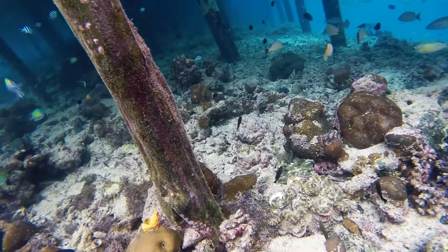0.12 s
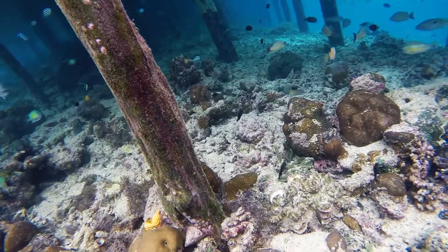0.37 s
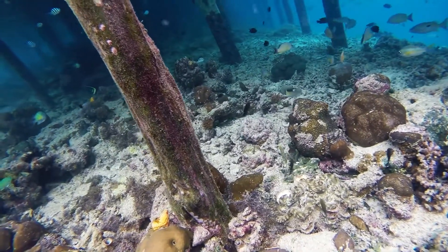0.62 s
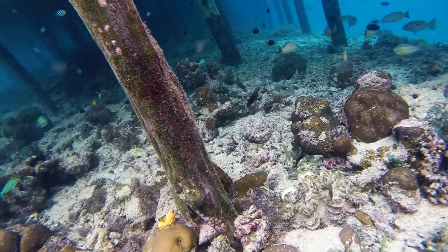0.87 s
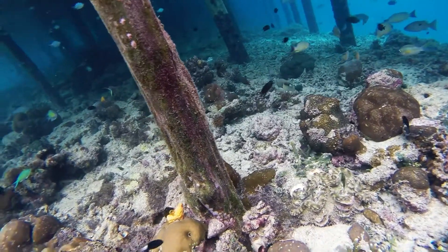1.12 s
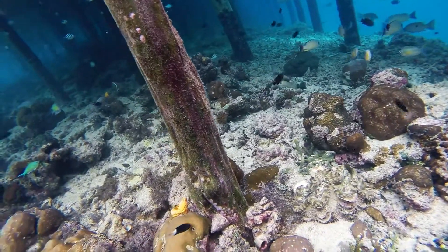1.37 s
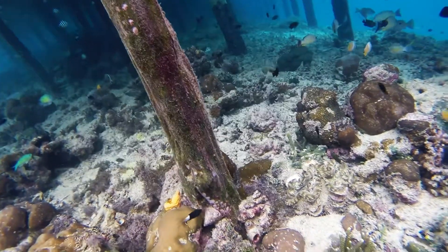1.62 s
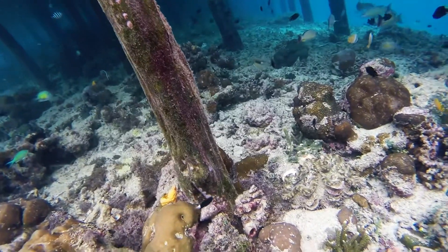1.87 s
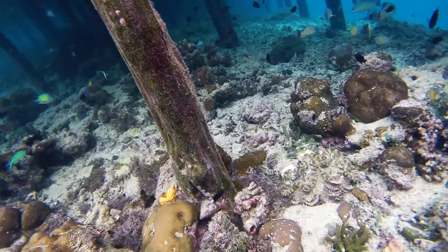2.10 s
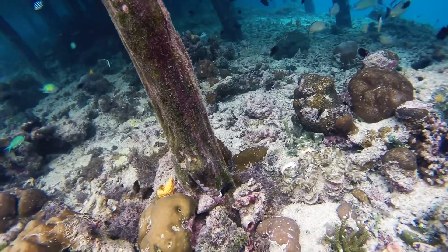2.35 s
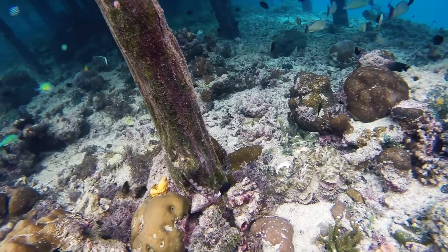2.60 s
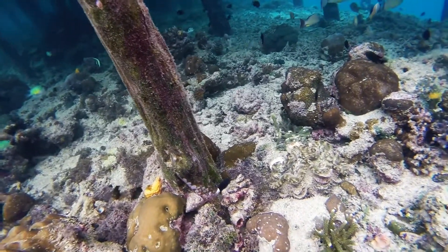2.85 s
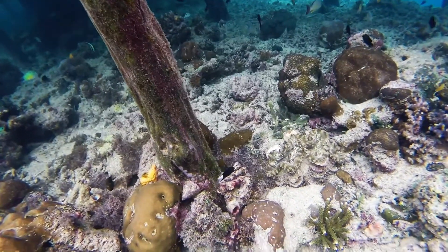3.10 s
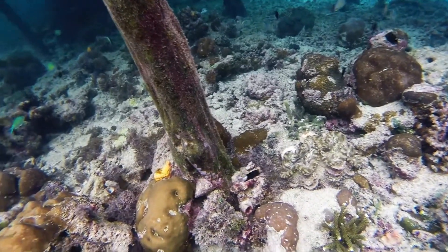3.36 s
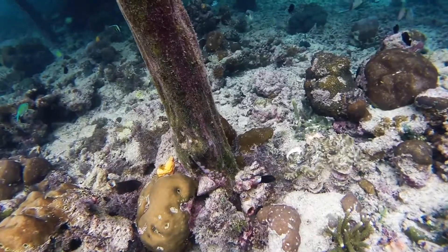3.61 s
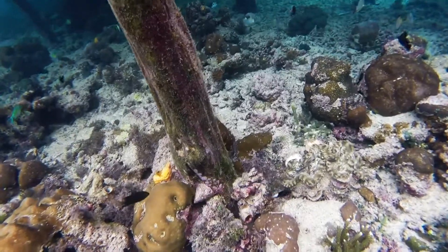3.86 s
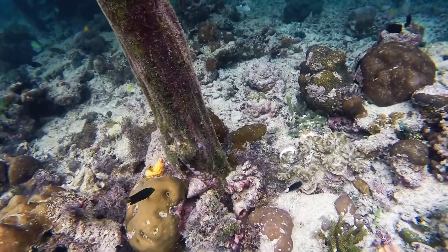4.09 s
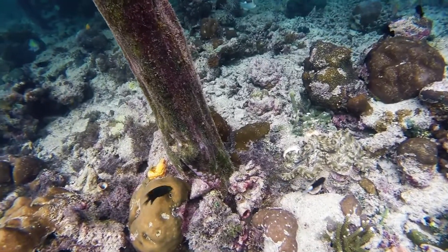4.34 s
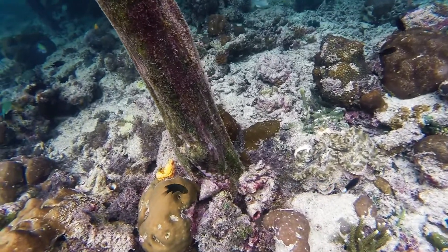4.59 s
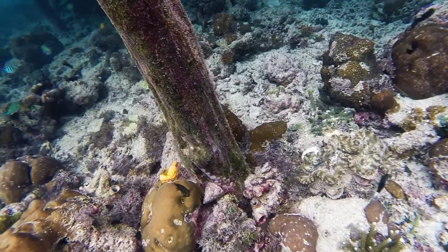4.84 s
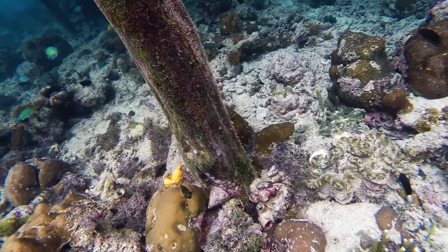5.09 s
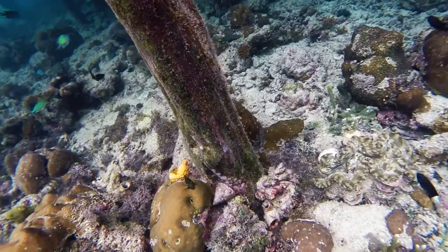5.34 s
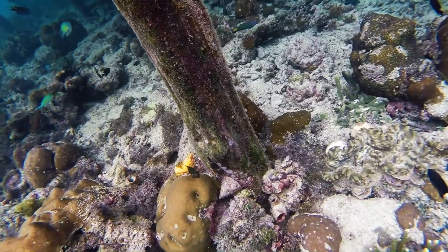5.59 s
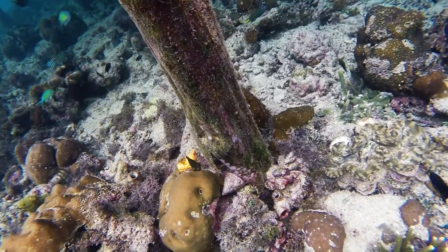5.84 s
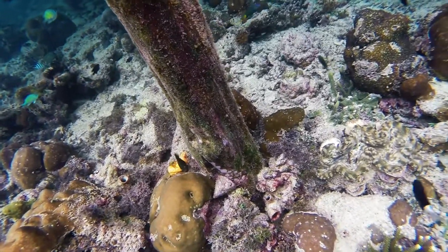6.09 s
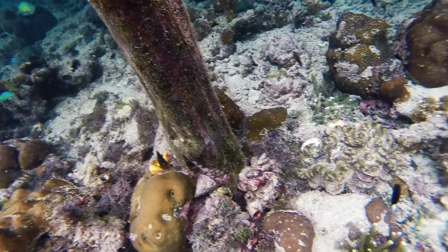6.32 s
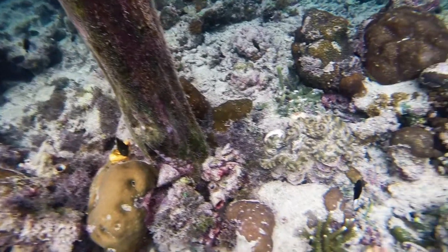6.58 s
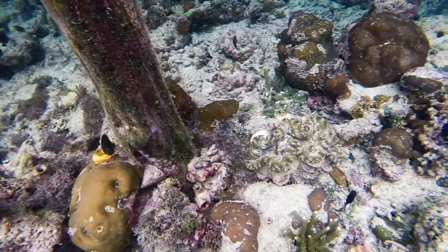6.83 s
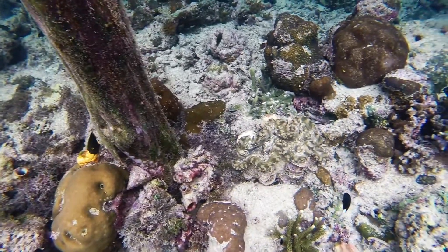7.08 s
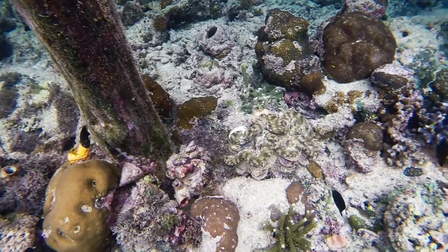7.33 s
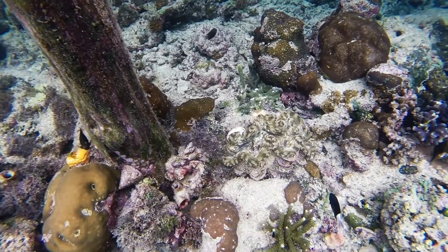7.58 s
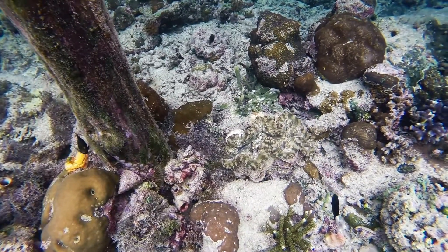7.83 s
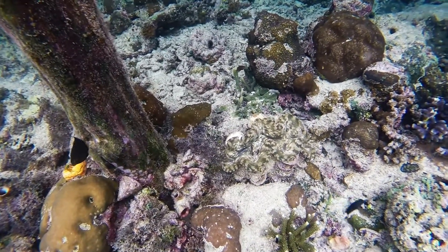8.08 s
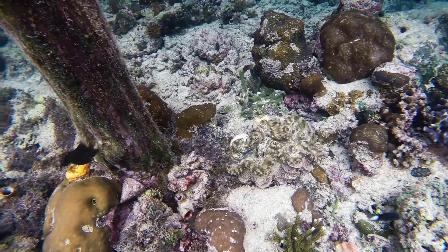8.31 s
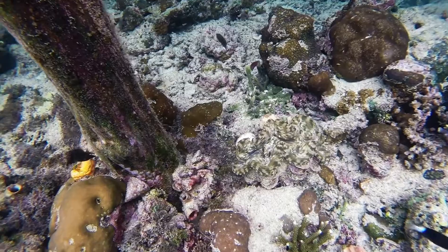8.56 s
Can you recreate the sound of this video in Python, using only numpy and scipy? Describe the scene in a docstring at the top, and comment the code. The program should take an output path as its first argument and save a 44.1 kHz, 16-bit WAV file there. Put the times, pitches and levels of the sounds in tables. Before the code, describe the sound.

Sharp shrimp snaps crackle over a faint underwater rumble, with soft fish pops and a patch of low bumps and knocks on the camera housing.

```python
"""Under a pier, over a shallow reef, a small camera drifts in a sealed hand-held housing.
Snapping shrimp crackle near and far: each snap excites the damped modes of the housing wall.
Fish pop and grunt as swim bladders twitch, heard as short wavelets, over coloured sea noise.
The housing rubs, knocks and rumbles: filtered noise, slow pushes and one ringing case mode.
Once a faint swish rises: a gliding tone modulated by noise."""
import sys
import numpy as np
from scipy import signal
from scipy.fft import rfft, irfft
from scipy.io import wavfile

SR = 44100
rng = np.random.default_rng(int(sys.argv[2]) if len(sys.argv) > 2 else 0)


def invert_db(x):
    """Field ratio 10**(x/20) for x, a level in decibels (scalar or array-like)."""
    u = np.asarray(x, float) / 20
    return 10 ** u


def wav_record(signal):
    """Record a signal, one row per channel, as 16-bit PCM in the file named by sys.argv[1]."""
    frames = np.transpose(np.atleast_2d(signal))
    bounded = np.clip(frames, -1, 1)
    # unit amplitude maps onto the largest positive 16-bit level
    quanta = np.round(bounded * 32767).astype(np.int16)
    wavfile.write(sys.argv[1], SR, quanta)


N = 383229
TIME = np.arange(N) / SR  # s

# modes of the housing wall: (frequency [Hz], mean level [dB], mean-tuning decay t60 [s])
WALL = [(696, -6, 0.019), (1203, -10, 0.035), (1460, -2.5, 0.014), (1795, -4, 0.021), (2036, -2.5, 0.0087),
        (2190, -4, 0.016), (2491, -0.5, 0.017), (2930, 7, 0.0035), (3540, -2.5, 0.011), (3960, -0.5, 0.014),
        (4410, 4.5, 0.0085), (4934, 4.5, 0.0068), (6270, -2, 0.0089), (7430, 2, 0.0074),
        (8750, 3.5, 0.0043), (9950, -1.5, 0.0081), (11270, -5.5, 0.006), (13240, -5.5, 0.0073),
        (14800, -13, 0.0032)]
CASE_HZ, CASE_T60_S = 181, 0.066  # the ringing mode of the whole case


def rms_one(x):
    """Normalisation of the mean power: scales to unit rms."""
    return x / np.sqrt(np.mean(x ** 2) + 1e-20)


def band(x, low_hz, high_hz):
    """Band-pass filtering by a Butterworth resonator."""
    return signal.sosfilt(signal.butter(2, [low_hz, high_hz], "band", fs=SR, output="sos"), x)


def ring(clicks, hz, t60):
    """Impulse response of a damped resonator: a unit click starts a decaying sine of height 1."""
    radius = invert_db(-60 / (t60 * SR))
    angle = 2 * np.pi * hz / SR
    poles = [1, -2 * radius * np.cos(angle), radius * radius]
    return signal.lfilter([0, np.sin(angle)], poles, clicks + 1e-18)  # the offset avoids denormals


def drift(rate):
    """Slow random modulation: lines join normal values of spread 1, rate of them per second."""
    knots = rng.standard_normal(1000)
    return np.interp(TIME * rate, np.arange(len(knots)), knots)


def grains(per_s, spread_db):
    """Random impulse process: clicks of either sign at chance moments, many small and few large."""
    size_db = spread_db * np.minimum(rng.exponential(1, N), 4.0)
    sizes = invert_db(size_db) * rng.choice([-1, 1], N)
    return sizes * (rng.random(N) < per_s / SR)


def add(out, s, shape, peak_db):
    """Linear superposition: lays a short shape into the track at its peak level."""
    i = int(s * SR)
    scaled = invert_db(peak_db) * shape / np.abs(shape).max()
    out[i:i + len(shape)] += scaled[:N - i]


def twitch(hz, cycles, lean):
    """Pulsation of a swim bladder: a Gaussian wavelet, returned with the time of its centre."""
    span = np.clip(cycles, .7, 6) / hz
    u = TIME[:2200] - span
    return np.exp(-(u / (0.36 * span)) ** 2) * np.cos(2 * np.pi * hz * u + lean), span


def blips(per_s, low_hz, high_hz, cycles):
    """Resonators in cascade: random clicks, dealt to six pitches, ring softly; rms 1."""
    clicks = grains(per_s, spread_db=4.0)
    dealt = rng.integers(0, 6, N)
    total = np.zeros(N)
    for k, hz in enumerate(np.geomspace(low_hz, high_hz, 6)):
        once = ring(clicks * (dealt == k), hz, cycles / hz)
        total += ring(once, hz, cycles / hz) * hz  # ringing twice softens the onset
    return rms_one(total)


def effort(start, length, level_db, rest_db):
    """Addition of powers: movements rise quickly, hold and die away over the still hand's level."""
    rise_s, fall_s = 0.011, 0.033
    coarse = TIME[::100]
    since = coarse - start[:, None]
    rise = np.clip(since / rise_s, 0, 1)
    fall = np.exp(-np.maximum(since - length[:, None], 0) / fall_s)
    power = invert_db(rest_db) ** 2 + invert_db(level_db) ** 2 @ (rise * fall) ** 2
    return np.interp(TIME, coarse, np.sqrt(power))


def water():
    """Spectral shaping of white noise: smooth sea noise and microphone hiss."""
    # noise colour: (frequency [Hz], relative level [dB])
    sea_colour = [(12, -26), (20, -0.5), (163, -4.5), (301, -11), (660, -17.5), (897, -18.5), (2020, -26.5),
                  (2530, -21.5), (4540, -25.5), (5530, -28.5), (7520, -28), (12100, -37), (13500, -33),
                  (14700, -38), (16000, -36)]
    hz, level_db = np.transpose(sea_colour)
    f = np.maximum(np.fft.rfftfreq(N, 1 / SR), 1)
    colour = invert_db(np.interp(np.log(f), np.log(hz), level_db))
    return invert_db(-55.5) * rms_one(irfft(rfft(rng.standard_normal(N)) * colour, N))


def far_pops():
    """Random superposition of distant fish: soft pops between low and middle pitch."""
    return invert_db(-65.5) * blips(40, 320, 693, cycles=9.0)


def far_snaps():
    """Modal excitation by a crowd: each distant shrimp's click wakes the wall modes unevenly."""
    snaps_per_s = 600 * invert_db(3.4 * drift(2.6))
    clicks = grains(snaps_per_s, spread_db=2.0)
    at = np.flatnonzero(clicks)
    out = np.zeros(N)
    for hz, level_db, t60 in WALL:
        tilt_db = -0.47 * np.log2(hz / 2500)
        luck_db = 8.1 * rng.standard_normal(len(at))
        struck = np.zeros(N)
        struck[at] = clicks[at] * invert_db(level_db + tilt_db + luck_db)
        out += ring(struck, hz, t60)
    return invert_db(-63) * rms_one(out)


def handling():
    """Stick-slip friction: a shifting grip gives lumpy sway, case ringing, fine creak and rubbing."""
    # shifts of the grip: (start [s], length [s], sway [dB], case ring [dB], creak [dB])
    grip_shifts = [(0, 0.71, -62, -76, -57.5), (0.536, 0.34, -60, -62.5, -58.5), (.9, 0.19, -54, -68, -60),
                   (1.355, 0.3, -47.5, -49, -55.5), (1.681, 0.22, -44, -50.5, -53),
                   (1.997, 0.21, -46, -58.5, -56), (2.42, 0.18, -56, -54, -55),
                   (2.827, 0.22, -48, -54.5, -63), (3.113, 0.16, -47.5, -60, -62),
                   (3.294, 0.091, -47, -42.5, -50), (3.426, 0.1, -52, -42.5, -48.5),
                   (3.56, 0.053, -54, -58, -53.5), (3.732, 0.43, -49, -57, -69),
                   (4.296, 0.44, -53, -74, -74), (5.051, 0.16, -53, -70, -58.5),
                   (5.494, 0.59, -66, -74, -60), (6.15, 0.34, -56, -70, -62), (7.892, 0.51, -55, -65, -74)]
    # skin rubbing along the case: (start [s], length [s], level [dB])
    skin_rubs = [(1.358, .08, -68), (1.68, 0.3, -63.5), (2.04, 0.15, -61), (3.298, 0.1, -60.5),
                 (3.445, 0.12, -61.5), (6.442, 0.083, -63)]
    start, length, sway_db, case_db, creak_db = np.transpose(grip_shifts)
    jerks = np.clip(drift(25.0), -2, 2)  # the hand moves in jerks that all layers feel
    sway = band(rng.standard_normal(N), 5, 47) * invert_db(4 * jerks)
    case_slips = grains(1200, spread_db=3.0)
    case = ring(band(case_slips, 81, 284) * invert_db(3.4 * jerks), CASE_HZ, CASE_T60_S)
    slips = grains(900, spread_db=4.0) * invert_db(1.2 * jerks)
    creak = ring(band(slips, 264, 598), 706, 0.014) + 4.7 * band(slips, 250, 960)
    rub = blips(1500, 840, 1837, cycles=11.0) * invert_db(2.2 * jerks)
    # the last argument of effort is the level of a still hand [dB]
    return (effort(start, length, sway_db, -62) * rms_one(sway)
            + effort(start, length, case_db, -68.5) * rms_one(case)
            + effort(start, length, creak_db, -63) * rms_one(creak)
            + effort(*np.transpose(skin_rubs), -68) * rms_one(rub))


def swish():
    """Amplitude modulation: gritty noise on a rising tone makes a narrow band that swells and fades."""
    # (start [s], length [s], level of the modulating noise [dB], first pitch [Hz], last pitch [Hz])
    glide = (1.63, .34, -61, 1200, 1850)
    start, length, level_db, first_hz, last_hz = glide
    progress = np.clip((TIME - start) / length, 0, 1)
    phase = 2 * np.pi * np.cumsum(first_hz + (last_hz - first_hz) * progress) / SR
    flutter = rms_one(band(rng.standard_normal(N), 9, 150))  # sidebands reach about 150 Hz each way
    swell = np.sqrt(np.sin(np.pi * progress).clip(0))
    return invert_db(level_db) * swell * flutter * np.sin(phase)


def knocks():
    """Impact and free vibration: a rasp as the grip slips, a slow push in and back, a ringing case."""
    # knocks on the housing: (middle of the push [s], peak level [dB], push length [s],
    # rasp gain [dB], rasp growth time [s])
    housing_knocks = [(1.395, -28, .012, -8, .0025), (1.423, -34, .012, -30, .004),
                      (1.437, -33, .012, -30, .004), (1.457, -36, .01, -8, .0025),
                      (1.472, -34, .014, -30, .004), (1.513, -36, .018, -30, .004),
                      (1.545, -37, .016, -30, .004), (1.586, -26, .016, -30, .004),
                      (1.617, -33, .014, -30, .004), (1.729, -26, .012, -20, .008),
                      (1.764, -31, .014, -25, .004), (1.851, -27, .014, -18, .004),
                      (1.886, -34, .016, -20, .004), (2.056, -35, .012, -25, .004),
                      (2.898, -18, .032, -42, .004), (3.265, -23, .0065, -16, .003),
                      (3.722, -38, .03, -30, .004), (3.747, -23, .016, -17, .016)]
    # light bumps that ring the case: (centre [s], peak level [dB])
    light_bumps = [(1.052, -44), (1.422, -36), (1.44, -39.5), (1.472, -39), (1.793, -37.5), (1.826, -30),
                   (1.899, -53), (2.448, -38), (2.466, -42.5), (2.848, -39), (2.877, -56), (2.923, -37),
                   (2.979, -39.5), (3.153, -43), (3.33, -32), (3.506, -39), (3.542, -42), (3.77, -35.5),
                   (6.427, -44.5), (7.935, -41), (8.179, -36.5), (8.342, -35)]
    rebound = 0.98  # how far the swing back outweighs the swing before
    t = TIME[:9000] - .04
    out = np.zeros(N)
    case = np.sin(2 * np.pi * CASE_HZ * t) * invert_db(-60 * t / CASE_T60_S) * np.clip(t * CASE_HZ, 0, 1)
    for s, peak_db, length, rasp_db, rasp_s in housing_knocks:
        u = t / (0.21 * length)
        push = (u * u - 1 + rebound * u) * np.exp(-u * u / 2)
        grit_swell = np.exp(np.where(t < 0, t / rasp_s, -t / 0.0011))
        grit = rng.standard_normal(len(t)) ** 3 * grit_swell
        rasp = 2 * band(grit, 300, 1000) + band(band(grit, 1300, 2600), 1300, 2600)
        add(out, s + t[0], push + invert_db(-6.5) * case + invert_db(rasp_db) * rasp, peak_db)
    for s, peak_db in light_bumps:
        add(out, s + t[0] - .006, case, peak_db)  # the ring starts 6 ms ahead of the centre
    return out


def grunts():
    """Pulse-train excitation: twitches space out as the muscle tires; the lowest wall mode rings along."""
    # trains of swim-bladder twitches:
    # (start [s], length [s], first gap [s], last gap [s], mid-train peak level [dB])
    trains = [(.589, .108, .0037, .0072, -35), (7.7995, .0475, .0056, .01, -27)]
    # twitch of each train: (pitch [Hz], length [cycles], lean [rad], unevenness [0-1])
    train_twitches = [(240, .9, 1.0, .06), (390, .85, -1.0, .01)]
    swell_db = 2.5  # growth over the whole train
    out = np.zeros(N)
    for train, (hz, cycles, lean, uneven) in zip(trains, train_twitches):
        start, length, first_gap, last_gap, peak_db = train
        progress = (TIME - start) / length
        gap = first_gap + (last_gap - first_gap) * np.clip(progress, 0, 1)
        active = (progress >= 0) & (progress < 1)
        count = np.cumsum(active / gap) / SR
        at = np.flatnonzero(np.diff(np.ceil(count)))  # a twitch at each whole count
        shape, centre = twitch(hz, cycles, lean)
        shape = shape + invert_db(-31) * ring(shape, WALL[0][0], .02)
        shape = band(shape, 100, 2000)  # a small bladder radiates no deep bass
        for i, (late, loud) in zip(at, uneven * rng.standard_normal((len(at), 2))):
            level_db = peak_db + swell_db * (progress[i] - .5) + 20 * loud
            add(out, i / SR - centre + late * gap[i], shape, level_db)
    return out


def pops():
    """Bladder resonance: each pop is one twitch of the swim bladder with a weak after-ring."""
    # fish pops: (centre [s], peak level [dB], pitch [Hz], length [cycles, later held to 0.7-6])
    fish_pops = [(0.045, -48, 423, 5.6), (0.201, -46, 288, 1.3), (0.231, -27.5, 257, 1.14),
                 (0.268, -30, 240, 1.1), (0.325, -29.5, 243, 1.13), (0.347, -50, 338, 2.8),
                 (0.399, -45, 422, 7.4), (0.413, -46, 384, 1.3), (0.469, -42, 399, 2.9),
                 (0.504, -32.5, 420, 1.3), (0.5592, -31, 278, 1.1), (0.5643, -25.5, 276, 1.25),
                 (0.582, -30, 533, 1.26), (1.147, -42, 546, 2.3), (1.751, -28, 486, 1.6),
                 (1.882, -38, 246, 1.1), (1.939, -41, 655, 5.6), (2.006, -30, 525, 1.9),
                 (2.023, -42, 412, 3.7), (2.081, -44, 214, 2.2), (2.136, -39.5, 546, 2.8),
                 (2.169, -45, 285, 0.62), (2.21, -29.5, 530, 1.75), (2.244, -43, 351, 1.7),
                 (2.316, -41.5, 385, 2.3), (2.386, -32.5, 384, 1.4), (2.497, -45, 466, 0.71),
                 (2.584, -45, 513, 1.5), (2.599, -51, 383, 1.1), (3.314, -28, 320, 0.58),
                 (3.522, -37, 318, 0.33), (3.598, -45, 484, 1.3), (3.79, -41, 660, 5.1),
                 (3.96, -43, 327, 0.58), (3.995, -40.5, 417, 0.51), (4.127, -37.5, 354, 1),
                 (4.631, -41, 382, 1.1), (4.789, -37, 434, 1.8), (4.823, -32.5, 493, 1.7),
                 (4.856, -41, 463, 2.3), (4.88, -40.5, 390, 2), (5.09, -37, 340, 1.2),
                 (5.128, -42, 466, 3.1), (5.187, -44, 433, 4.2), (5.272, -37.5, 700, 5.3),
                 (5.381, -40.5, 424, 0.94), (5.516, -33.5, 514, 1.8), (5.579, -38, 716, 5.5),
                 (5.595, -40, 500, 1.7), (5.745, -28.5, 463, 1.67), (5.998, -43, 450, 3),
                 (6.164, -47, 634, 6.3), (6.227, -22, 495, 2.07), (6.266, -42, 654, 6.8),
                 (6.306, -41, 636, 7), (6.409, -44, 457, 1.1), (6.452, -35, 596, 3.2),
                 (6.475, -29.5, 540, 3.1), (6.517, -29, 516, 3.3), (6.547, -37, 342, 0.93),
                 (6.8, -44, 417, 2.1), (7.284, -44, 530, 1.7), (7.381, -43, 268, 2),
                 (7.548, -37, 375, 0.97), (7.995, -37.5, 527, 2.9), (8.037, -44, 636, 6.5),
                 (8.062, -41, 510, 1.3), (8.112, -47, 319, 0.8), (8.575, -40.5, 540, 1.3)]
    out = np.zeros(N)
    for s, peak_db, hz, cycles in fish_pops:
        shape, centre = twitch(hz, cycles, np.pi / 2)
        after_ring = ring(shape, hz, 0.036) * hz / SR * 2 * np.pi
        add(out, s - centre, shape + invert_db(-28.5) * after_ring, peak_db)
    return out


def near_snaps():
    """Modal superposition: each snap strikes every wall mode in its own way; scattered copies trail it."""
    # near shrimp snaps: (time [s], peak level [dB], brightest frequency [Hz],
    # focus, by its size the loss one octave away [dB], delay of the bounce off nearby rock [ms])
    shrimp_snaps = [(0.0275, -47, 1500, -0.5, 0.65), (0.101, -42.0, 6440, 11, 0.21),
                    (0.226, -42.5, 2690, -1, 0.65), (0.3993, -38, 2690, 10, 0.28),
                    (0.4291, -44, 2020, 38, 0.33), (0.4529, -36, 1750, 18, 0.26),
                    (0.5412, -23.5, 3960, 6, 0.38), (0.5573, -37.5, 11530, 1, 0.05),
                    (0.8437, -32, 2690, 28, 0.39), (0.855, -10.5, 2350, 3.5, 0.35),
                    (0.9124, -31.5, 3540, 30, 0.09), (1.0594, -24.5, 3960, 10.5, 0.09),
                    (1.1002, -38.5, 2440, 17, 0.37), (1.2043, -38.5, 2960, 22, 0.61),
                    (1.2246, -29.5, 5750, 14, 0.091), (1.2894, -35, 5300, 5, 0.09),
                    (1.311, -36, 14000, 0, 0.046), (1.3315, -20, 3300, 9, 0.33),
                    (1.3589, -37, 12700, 4, 0.096), (1.4923, -25.5, 3220, 18, 0.35),
                    (1.5829, -38.5, 4810, 3, 0.05), (1.6124, -42, 2440, 7, 0.28),
                    (1.758, -42, 3960, 6, 0.64), (1.8192, -41.5, 3590, 1.5, 0.07),
                    (1.9592, -42, 2690, 3, 0.12), (2.0137, -32, 3960, 15, 0.12),
                    (2.1475, -31, 7090, 3, 0.55), (2.3154, -45.5, 5400, 13, 0.35),
                    (2.444, -43, 3590, 15, 0.097), (2.4616, -17, 4550, 5.5, 0.13),
                    (2.491, -27.5, 4370, 1.5, 0.37), (2.6924, -34.5, 1820, 9, 0.36),
                    (2.741, -30, 5160, 7, 0.057), (2.7524, -42, 4370, 11, 0.076),
                    (2.8168, -39, 4370, 5, 0.41), (2.865, -34, 6440, 8, 0.093),
                    (2.909, -18.5, 2210, 2.5, 0.43), (3.153, -39, 3590, 11, 0.1),
                    (3.187, -25, 8610, 1.5, 0.045), (3.2112, -33.5, 6440, 5, 0.079),
                    (3.2595, -21, 3730, 14, 0.15), (3.3113, -37.5, 2720, 28, 0.07),
                    (3.3832, -40.5, 5300, 3, 0.085), (3.5343, -41, 1500, 0, 0.29),
                    (3.6107, -42.0, 2690, 0, 0.35), (3.7153, -41.5, 2700, 3, 0.41),
                    (3.7796, -44.0, 4370, 15, 0.099), (3.8083, -42.5, 5840, 6, 0.48),
                    (3.8338, -34, 3960, 6.5, 0.11), (3.869, -44, 3590, 13, 0.13),
                    (3.9065, -42, 14000, 1, 0.046), (3.916, -33, 4370, 3, 0.36),
                    (4.0467, -30, 3620, 17, 0.13), (4.0738, -22.5, 1500, 0.5, 0.05),
                    (4.2045, -33, 4840, 19, 0.11), (4.2287, -24, 2120, 2.5, 0.35),
                    (4.2531, -20.5, 3960, 9, 0.058), (4.278, -22, 2200, 3, 0.38),
                    (4.367, -37.5, 3960, 26, 0.14), (4.3831, -43.5, 3260, 8, 0.66),
                    (4.4173, -28.5, 4650, 4.5, 0.4), (4.7016, -28.5, 4400, 16, 0.086),
                    (4.7117, -38, 6440, 20, 0.23), (4.7532, -43.5, 4370, 4, 0.29),
                    (4.8538, -42, 1500, 26, 0.38), (4.882, -40.5, 4330, 3, 0.067),
                    (5.0314, -46.5, 1500, -1, 0.24), (5.1284, -31.5, 2200, 9, 0.36),
                    (5.1642, -41, 4370, 4, 0.6), (5.2216, -35, 8610, 1.5, 0.035),
                    (5.275, -33.5, 5260, 14, 0.18), (5.2857, -44.5, 3960, 11, 0.52),
                    (5.3739, -42.0, 3960, 6, 0.59), (5.4702, -42, 3220, 28, 0.45),
                    (5.5051, -41.0, 3960, 8, 0.093), (5.5178, -33.0, 1650, 3, 0.52),
                    (5.523, -41, 1500, 22, 0.27), (5.6436, -42, 4370, 28, 0.43),
                    (5.67, -40.5, 10460, 5, 0.05), (5.7996, -44, 5300, 4, 0.23),
                    (5.874, -29.5, 3280, 11, 0.086), (5.9314, -43, 2440, 8, 0.52),
                    (5.941, -34.5, 4810, 5, 0.09), (5.9494, -41, 5300, 4, 0.07),
                    (5.9728, -27, 3960, 4, 0.067), (6.0723, -28.5, 6560, 7, 0.11),
                    (6.094, -42, 5840, 2, 0.05), (6.117, -42.5, 2960, 9, 0.083),
                    (6.1812, -38, 8610, 10, 0.033), (6.2039, -40.0, 3590, 0, 0.27),
                    (6.3746, -34, 4810, 11, 0.17), (6.4057, -31.5, 4300, 4.5, 0.47),
                    (6.4725, -33, 1510, 21, 0.22), (6.4902, -25, 4160, 9, 0.076),
                    (6.515, -42, 1500, 28, 0.18), (6.5612, -36.5, 6440, 7, 0.32),
                    (6.8197, -43, 14000, 20, 0.043), (6.8485, -32.5, 2400, 3.5, 0.34),
                    (6.8585, -44, 2440, 10, 0.46), (7.1887, -41, 1820, 3, 0.32),
                    (7.1992, -30.0, 4750, 28, 0.41), (7.224, -40, 7090, 11, 0.52),
                    (7.242, -39.5, 14000, 1, 0.046), (7.2756, -39, 3590, 3, 0.29),
                    (7.2934, -44, 1820, 2, 0.27), (7.3087, -33, 3520, 18, 0.37),
                    (7.3698, -43.0, 4370, 5, 0.07), (7.4016, -39.5, 1500, 3, 0.062),
                    (7.4075, -47, 2600, 14, 0.26), (7.4742, -31.0, 3560, 7, 0.08),
                    (7.559, -41.5, 4300, 24, 0.09), (7.5872, -43.0, 4810, 28, 0.34),
                    (7.5974, -42.5, 4810, 11, 0.41), (7.6917, -31, 4810, 15, 0.16),
                    (7.8505, -40.5, 3260, 3, 0.54), (7.8769, -32.5, 5950, 6, 0.36),
                    (7.9218, -34.5, 3540, 13, 0.52), (7.9928, -44, 6440, 1, 0.39),
                    (8.022, -38.5, 4370, 4, 0.06), (8.08, -24.5, 2630, 8, 0.3),
                    (8.1837, -28.5, 4740, 26, 0.42), (8.204, -41, 5840, 6, 0.09),
                    (8.2269, -40.5, 5300, 11, 0.32), (8.3505, -37.5, 4810, 1.5, 0.067),
                    (8.525, -46, 5300, 20, 0.23), (8.5389, -38.5, 14000, 12, 0.044),
                    (8.5829, -29.5, 3500, 5.5, 0.39), (8.5907, -41.5, 4810, 8, 0.11),
                    (8.622, -37.5, 3200, 28, 0.13), (8.6725, -46, 7820, 5, 0.05)]
    focus_limit_db, bounce_db = 17.5, -4.5  # the focus takes no more than the limit from any mode
    scatter_db, scatter_t60_s = -35, .011  # scatter off seabed and coral
    t, out = TIME[:900], np.zeros(N)
    hz, level_db, t60 = np.transpose(WALL)
    decay = invert_db(-60 * np.outer(1 / t60, t))
    decay *= 1 - np.exp(-t / 0.000041)  # the wall takes a moment to move
    count = len(WALL)
    polarity = (-1) ** np.arange(count)
    chance = rng.standard_normal((len(shrimp_snaps), 2 * count + len(t)))
    for (s, peak_db, bright_hz, focus_db, bounce_ms), luck in zip(shrimp_snaps, chance):
        octaves = np.log2(np.maximum(hz, 1400) / bright_hz)
        loss_db = np.minimum(abs(focus_db) * octaves ** 2, focus_limit_db)
        strength = invert_db(level_db - loss_db + 2 * luck[:count]) * polarity
        tuning = hz * (1 + .02 * luck[count:2 * count])  # the angle of arrival shifts the modes
        shape = strength @ (np.sin(2 * np.pi * np.outer(tuning, t)) * decay)
        shape += invert_db(bounce_db) * np.interp(t - bounce_ms / 1000, t, shape, left=0)
        scatter = invert_db(scatter_db - 60 * t / scatter_t60_s) * (t > .0004)
        paths = luck[2 * count:] ** 3 * scatter  # cubing leaves a few strong echoes
        paths[0] = 1  # the direct sound
        add(out, s, signal.fftconvolve(shape, paths)[:len(t)], peak_db)
    return out


def scene():
    """Linear superposition of all sources at the one microphone."""
    background = water() + far_pops() + far_snaps()
    housing = handling() + swish() + knocks()
    return (background + housing + grunts() + pops() + near_snaps())[None]


def top_cut(x):
    """Nothing passes above the cut-off."""
    return signal.sosfilt(signal.butter(12, 16490, fs=SR, output="sos"), x)


def record(dry):
    """Low-pass filtering: a steep Chebyshev filter takes the top down by at least 24 dB."""
    low_pass = signal.cheby2(14, 24, 15500, fs=SR, output="sos")
    mix = signal.sosfilt(low_pass, dry)
    return top_cut(mix)


dry = scene()
out = record(dry)
wav_record(out)
```